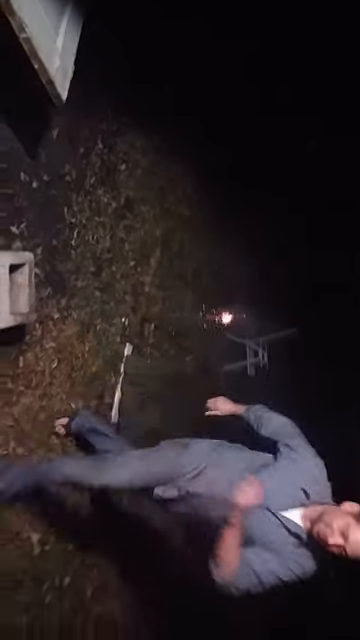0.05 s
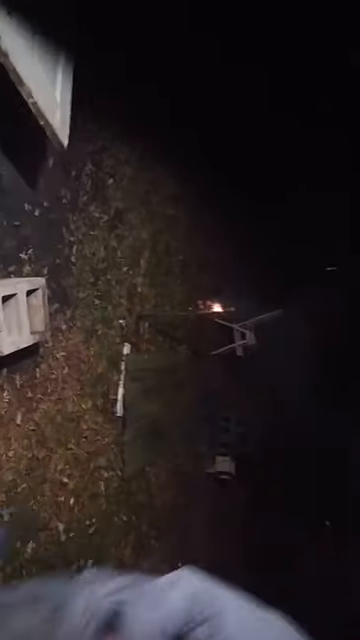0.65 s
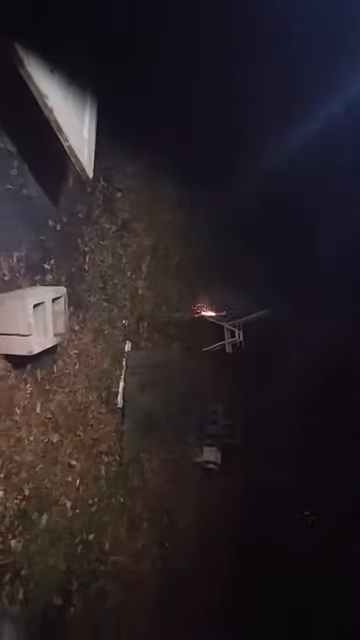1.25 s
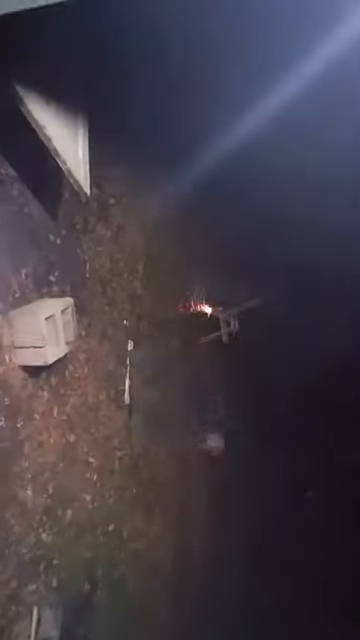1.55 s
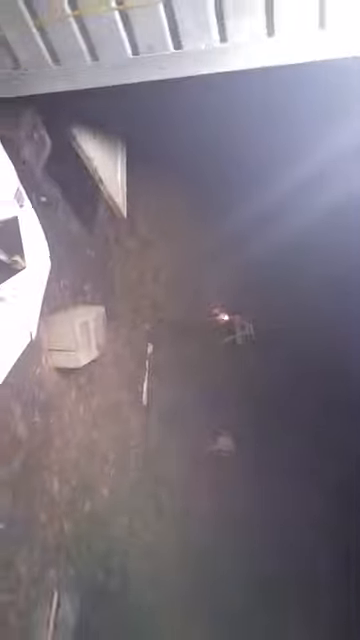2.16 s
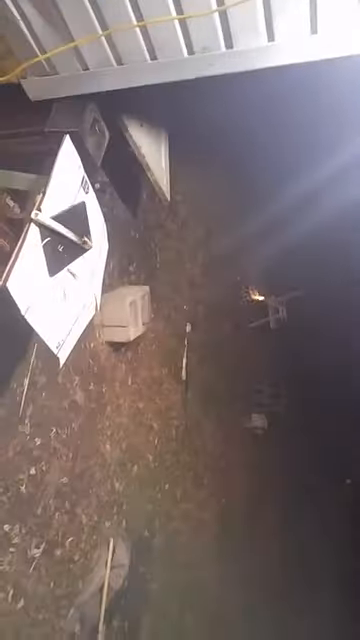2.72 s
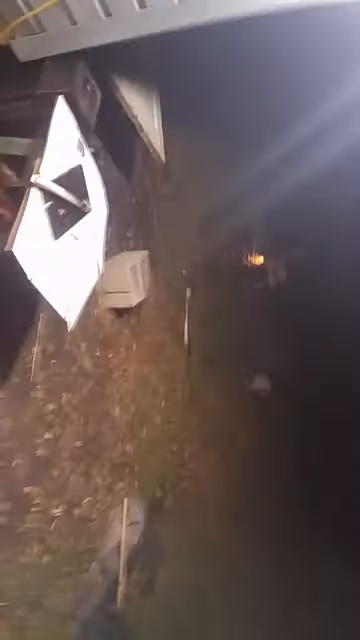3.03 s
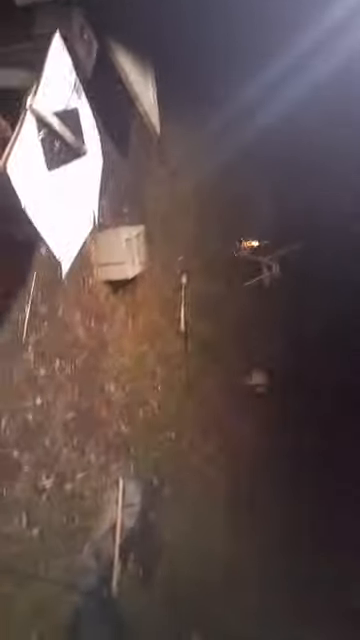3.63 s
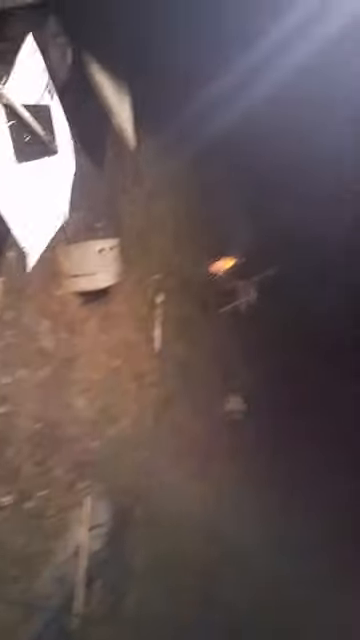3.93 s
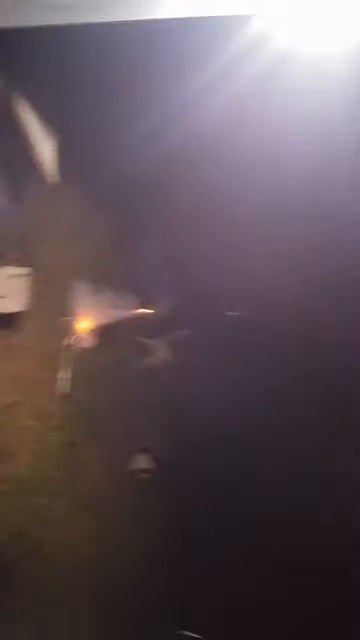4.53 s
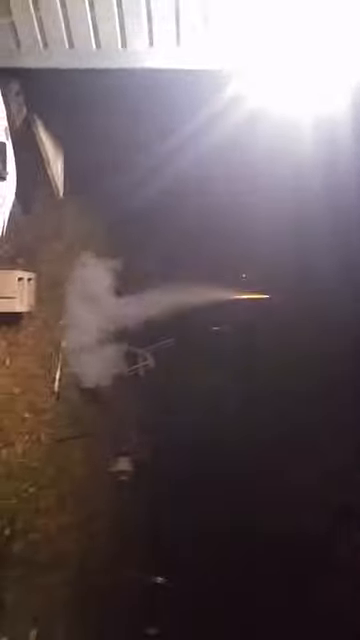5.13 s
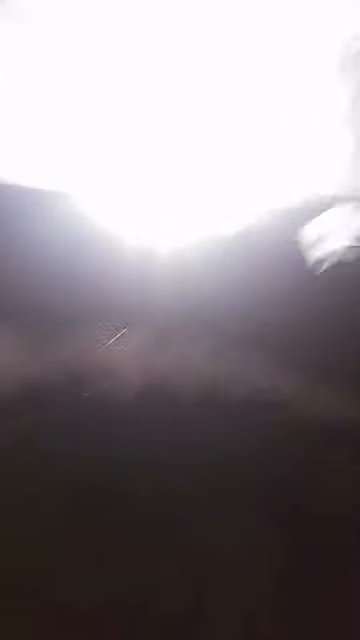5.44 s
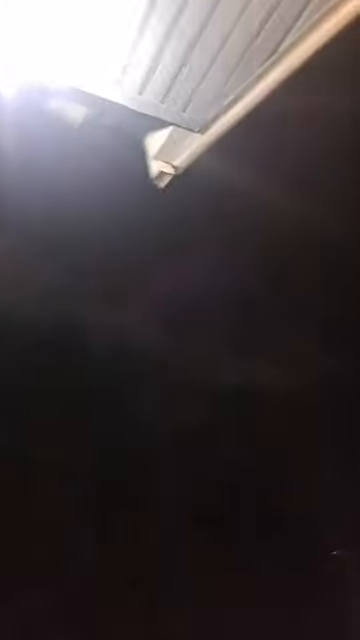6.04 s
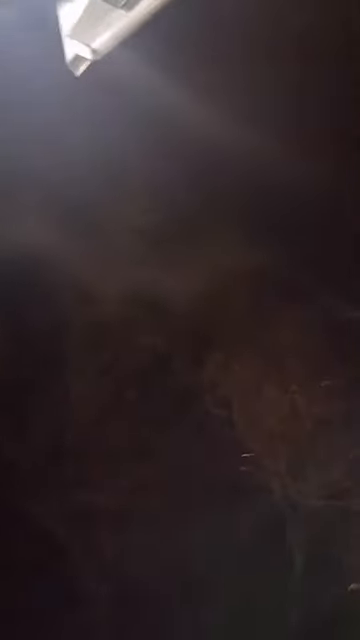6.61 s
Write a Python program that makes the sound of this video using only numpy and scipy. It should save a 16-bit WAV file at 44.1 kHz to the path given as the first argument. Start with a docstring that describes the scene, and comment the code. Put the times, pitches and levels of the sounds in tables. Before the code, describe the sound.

Footsteps crunch in dry leaves under thin high chirps, then a small rocket hisses, swells to a loud whoosh and quickly fades away.

```python
"""Feet rustle and crunch in dry leaves close by, in a yard at night, while a small animal gives thin,
high chirps and a fuse fizzes. A small rocket motor catches: gas whistles in the resonances of its
nozzle, then the turbulent jet swells to a tearing whoosh that overloads the microphone at lift-off.
As the rocket climbs, its ground echo lags ever more, and interference sweeps the fading sound."""
import sys
import numpy as np
from scipy import signal
from scipy.fft import rfft, irfft, next_fast_len
from scipy.io import wavfile
from scipy.ndimage import uniform_filter1d, map_coordinates

SR = 44100
rng = np.random.default_rng(int(sys.argv[2]) if len(sys.argv) > 2 else 0)


def transcribe(signal):
    """Save signal, clipped to [-1, 1], as a 16-bit WAV file at the path in sys.argv[1]."""
    frames = np.atleast_2d(signal).T
    limited = np.clip(frames, -1, 1)
    pcm = np.round(limited * 32767).astype(np.int16)
    wavfile.write(sys.argv[1], SR, pcm)


N = 302967
T = np.arange(N) / SR
SIZE = next_fast_len(N + 4096, True)
FREQS = np.fft.rfftfreq(SIZE, 1 / SR)

# Spectrum of crunching leaves and stems. Each row: frequency in Hz, level in dB.
CRUNCH_SPECTRUM = [(600, -16), (1000, 1.5), (1600, 3), (3000, -1), (5000, -3), (7000, -2.5), (10000, -7),
                   (15000, -27)]
# Low and middle modes of the ground and boards. Each row: frequency in Hz, bandwidth in Hz, level in dB.
THUD_RESONANCES = [(125, 77, -10), (262.6, 38, 1.5), (303.2, 64, 0), (379, 85, -8)]
KNOCK_RESONANCES = [(674.6, 60, -2.5), (767, 115, 5), (925, 157, -7.5)]


def undb(db):
    """Convert decibels to an amplitude ratio."""
    return 10 ** (np.asarray(db) / 20)


def unit(x):
    """Normalise to an rms of 1."""
    return x / np.sqrt(np.mean(x ** 2))


def curves(table):
    """Linear interpolation of each column over the times in the first."""
    times, *columns = np.transpose(table)
    return [np.interp(T, times, column) for column in columns]


def burst(start, rise, hold, decay):
    """Envelope with linear attack, hold and exponential decay, all in seconds."""
    return np.clip((T - start) / rise, 0, 1) * np.exp(-np.maximum(T - start - rise - hold, 0) / decay)


def noise():
    """Gaussian white noise."""
    return rng.standard_normal(N)


def waver(rate):
    """Random fluctuation of rms 1 that takes a new course `rate` times a second."""
    knots = rng.standard_normal(8000)
    return unit(np.interp(T * rate, np.arange(len(knots)), knots))


def grains(rate, spread_db):
    """Shot noise: `rate` random clicks a second, a few much larger than the rest."""
    size = undb(spread_db * np.minimum(rng.exponential(size=N), 4))
    return unit((rng.random(N) < rate / SR) * size * np.sign(noise()))


def colour(x, points):
    """Spectral shaping by (Hz, dB) points, falling 20 dB an octave beyond the ends."""
    hz, db = np.transpose(points)
    octave = np.log2(FREQS + 1)
    beyond = abs(octave - np.clip(octave, np.log2(hz[0]), np.log2(hz[-1])))
    gain = unit(undb(np.interp(octave, np.log2(hz), db) - 20 * beyond))
    return irfft(rfft(x, SIZE) * gain, SIZE)[:N]


def resonate(x, modes):
    """Forced vibration of parallel resonators, each given as (Hz, bandwidth in Hz, dB)."""
    out = 0
    for hz, width, db in modes:
        section = np.concatenate(signal.iirpeak(hz, hz / (1.5 * width), fs=SR))
        out = out + undb(db) * signal.sosfilt([section, section], x + 1e-18) / np.sqrt(width)
    return out * np.sqrt(.4 * SR / sum(undb(2 * db) for _, _, db in modes))


def delay(x, ms):
    """Propagation delay along a path whose length may change."""
    return map_coordinates(x, [(T - ms / 1000) * SR], order=3)


def yard(x, wet_db, t60, gap_s):
    """Reverberation: scattering from ground, house and trees adds a decaying tail of sparse echoes."""
    t = T[:SR // 2]
    tail = noise()[:len(t)] * (rng.random(len(t)) < .03) * undb(-60 * t / t60) * (t > gap_s)
    return x + undb(wet_db) * signal.oaconvolve(x, tail / np.linalg.norm(tail))[:N]


def night_air():
    """Ambient noise: a steady bed, a hollow resonant rustle, leaf ticks and a thin hiss near the end."""
    # Spectrum of the outdoor background. Each row: frequency in Hz, level in dB.
    air_spectrum = [(25, -40), (45, -5), (80, 1), (180, -0.5), (280, -6), (480, -6), (750, -3),
                    (1300, -9.5), (3500, -19.5), (7000, -18.5), (9000, -16.5), (11000, -25.5), (15500, -26)]
    rustle = undb(-.5) * resonate(noise(), THUD_RESONANCES)
    rustle += undb(-.3) * resonate(noise(), KNOCK_RESONANCES)
    ticks = colour(grains(rate=45, spread_db=3.8), CRUNCH_SPECTRUM)
    ticks = yard(ticks, wet_db=1.5, t60=.069, gap_s=.0005)
    hiss = colour(noise(), [(6000, -8), (11000, -2), (15500, -4)]) * np.clip((T - 6.52) / .1, 0, 1)
    bed = undb(-49) * colour(noise(), air_spectrum)
    return bed + undb(-50.7 + 2.5 * waver(13)) * rustle + undb(-61.5) * ticks + undb(-57.5) * hiss


def animal_chirps():
    """Frequency modulation: each slightly raspy squeak glides down through its pitch."""
    # The animal's calls. Each row: time in seconds, relative level in dB, pitch in Hz, length in seconds.
    calls = [(0.005, -35, 8100, .029), (0.054, -31.5, 9030, .011), (0.102, -29, 8930, 0.032),
             (0.51, -30, 8630, 0.0093), (0.751, -25.5, 8640, .018), (0.83, -36, 8960, 0.0083),
             (0.993, -27, 8420, 0.011), (1.204, -31.5, 8470, .017), (1.507, -19, 8200, .012),
             (1.522, -24, 9260, 0.019), (1.72, -30, 9600, 0.017), (1.777, -23, 8840, 0.0064),
             (1.84, -26.5, 8800, 0.0096), (1.907, -22, 8610, .013), (2.025, -19, 8820, 0.0068),
             (2.0897, -21, 8460, 0.0088), (2.218, -21.5, 8420, 0.0078), (2.412, -15.5, 8340, 0.0088),
             (2.547, -26, 8400, .007), (2.727, -26.5, 8370, .011), (2.794, -21, 8260, .01),
             (3.068, -17, 8800, 0.0068), (3.585, -18, 8940, 0.0069), (3.697, -23, 9060, .008),
             (3.759, -25, 9200, 0.011), (3.824, -17.5, 8320, 0.0097), (3.887, -19, 9290, 0.0097),
             (5.947, -31, 8340, .009), (6.186, -31.5, 8620, 0.021), (6.273, -33, 8860, 0.0076),
             (6.4, -23.5, 8346, 0.012), (6.782, -20, 8060, 0.015), (6.84, -15, 8900, .007)]
    out, t = np.zeros(N), T[:SR // 10]
    rasp = 1 + .023 * waver(900)
    for start, db, hz, length in calls:
        i = max(int((start - .0025) * SR), 0)
        swoop = .0577 * np.exp(.1 * (db + 21.5))  # louder calls glide further
        pitch = hz * (1 + swoop * (1.71 * np.exp(-t / .00367) - .4))
        tone = np.sin(2 * np.pi * np.cumsum(pitch[:N - i] * rasp[i:i + len(t)]) / SR)
        swell = (1 - np.exp(-(t / .0027) ** 2)) * np.exp(-(t / length) ** 2)
        out[i:i + len(t)] += undb(db - 4.5) * swell[:N - i] * tone
    fluttering = yard(out, wet_db=-.5, t60=.12, gap_s=.002)
    return yard(fluttering, wet_db=-10.5, t60=.35, gap_s=.01)


def footsteps():
    """Impact excitation: brush, heel and toe each drive the ground's modes and crush dry leaves."""
    # Steps and scuffs. Each row: heel time in seconds, level in dB, hardness in dB, length in seconds.
    footfalls = [(0.065, -33, -8, .065), (0.385, -25, -3, 0.053), (0.598, -40.5, 4.5, .03),
                 (0.692, -33.5, 0.5, .042), (0.77, -37, -2.5, 0.043), (0.842, -36.5, -5, 0.036),
                 (0.976, -28.5, -9.5, 0.07), (1.042, -28, -0.5, 0.051), (1.409, -29.5, -1, 0.042),
                 (1.599, -32.5, -1.5, 0.057), (1.634, -29, -1, 0.073), (1.952, -33.5, -2.5, 0.049),
                 (2.11, -38, 7, 0.022), (2.148, -30.5, -5.5, 0.073), (2.226, -34.5, -1.5, 0.1),
                 (2.28, -25.5, -2, 0.047), (2.468, -31.5, -4, 0.073), (2.571, -35.5, 4, .029),
                 (2.618, -32.5, -2.5, .1), (2.738, -38, 2, 0.084), (2.899, -29, -1, 0.067),
                 (2.984, -38, 4, 0.048), (3.192, -30.5, 0.5, 0.14), (3.458, -24.5, -1, 0.048),
                 (3.537, -30, -3, 0.062), (3.683, -31, -1.5, .05), (3.754, -33.5, -2, 0.031),
                 (3.992, -30, 0.5, 0.033), (4.057, -31.5, -1, 0.052), (4.111, -28.5, -5, 0.055),
                 (4.427, -28, -4, 0.07), (5.939, -30.5, 4.5, 0.052), (6.177, -36, 3.5, 0.079),
                 (6.577, -27.5, 5.5, 0.053), (6.639, -29.5, 4.5, .05), (6.825, -28, -4, 0.092)]
    # Resonances of single leaves. Each row: frequency in Hz, bandwidth in Hz, level in dB.
    leaf_modes = [(1370, 240, -0.5), (1740, 420, -2.5), (2330, 500, 0.5), (2890, 560, -3.5),
                  (4170, 470, -13)]
    power, t = np.zeros((3, N)), T[:SR // 3]
    for start, db, ground_db, length in footfalls:
        brush = (-.0487, -16, ground_db + 3.5, .11)
        heel = (0, 0, ground_db, length)
        toe = (.0723, -8, ground_db - 3, length)
        for lag_s, part_db, hard_db, span_s in [brush, heel, toe]:
            push = (1 - np.exp(-t / .002)) * np.exp(-(t / span_s) ** 1.5)
            knock = undb(hard_db - .3) * push
            crunch = undb(.72 * hard_db - 7.3) * push ** 1.57
            envelopes = undb(db + part_db) * np.array([push, knock, crunch])
            i = max(int((start + lag_s) * SR), 0)
            power[:, i:i + len(t)] += envelopes[:, :max(N - i, 0)] ** 2
    thud, knock, crunch = np.sqrt(power + 1e-18)  # incoherent sounds add in power
    body = resonate(noise() * thud, THUD_RESONANCES) + resonate(noise() * knock, KNOCK_RESONANCES)
    # Stems tick across the whole band; each leaf cracks at its own pitch and moment.
    stems = colour((grains(900, 2.7) + .54 * noise()) * crunch, CRUNCH_SPECTRUM)
    leaves = sum(undb(db) * resonate(grains(300, 2.8) * crunch, [(hz, width, 0)])
                 for hz, width, db in leaf_modes)
    return undb(-5) * body + yard(undb(-5) * stems + undb(-9.5) * leaves, wet_db=-10, t60=.5, gap_s=.008)


def stick_clacks():
    """Damped vibration: a short scrape rings two inharmonic modes of a stick."""
    # Sticks underfoot. Each row: start in seconds, relative level in dB, pitch in Hz.
    sticks = [(0.0745, -27.5, 2000), (0.784, -31, 1460), (0.9009, -30, 1400), (1.0143, -21, 1760),
              (1.4047, -29, 1400), (2.154, -23.5, 1430), (2.2494, -31, 1390), (2.485, -28, 2170),
              (2.9943, -26.5, 1470), (3.2004, -24.5, 2760), (3.4626, -24, 1400), (3.5089, -21.5, 2220),
              (3.909, -32, 2150), (3.9931, -25, 1370), (4.0366, -22, 1390), (4.141, -21.5, 2330)]
    out, t = np.zeros(N), T[:SR // 12]
    for start, db, hz in sticks:
        scrape = noise()[:len(t)] * np.exp(-t / .0065)
        phase = 2 * np.pi * hz * t
        ring = np.exp(-t / .00099) * (np.sin(phase) + .24 * np.sin(1.56 * phase))
        clack = np.convolve(scrape, ring[:600])[:len(t)]
        i = int(start * SR)
        out[i:i + len(t)] += undb(db - 5) * clack / abs(clack).max()
    return yard(out, wet_db=-5.5, t60=.25, gap_s=.0033)


def snaps():
    """Impulsive sources: twigs and sparks crack so briefly that their spectrum is broad."""
    # Snapping twigs and sparks. Each row: start in seconds, relative level in dB.
    snap_events = [(1.637, -20), (2.0078, -30), (2.4858, -27.5), (2.616, -27.5), (2.898, -19.5),
                   (3.261, -23), (3.509, -29), (3.994, -22), (6.551, -28), (6.5796, -33)]
    cracks = np.zeros(N)
    for start, db in snap_events:
        crack = noise()[:200] * np.exp(-T[:200] / .0005)
        i = int(start * SR)
        cracks[i:i + len(crack)] += undb(db) * crack / abs(crack).max()
    cracks = colour(cracks, [(500, 1), (2000, 1), (6200, -1), (10000, -6), (15000, -24)])
    return yard(undb(6.5) * cracks, wet_db=-10, t60=.29, gap_s=.004)


def fuse():
    """Combustion noise: powder sputters steadily and spurts now and then, until the motor takes over."""
    # Spurts of burning powder. Each row: start in seconds, level in dB, hold in seconds.
    spurts = [(0.2, -57, .03), (0.612, -59, 0.069), (1.038, -53, 0.042), (1.47, -57, .02),
              (2.598, -48, .02), (3.208, -49.5, 0.022)]
    # Spectrum of the fizz. Each row: frequency in Hz, level in dB.
    fizz_spectrum = [(2000, -21), (4500, -10.5), (7000, -4.5), (9000, -3.5), (11000, -10), (15000, -19)]
    power = undb(-63 + 2.9 * waver(8)) ** 2
    for start, db, hold in spurts:
        power += (undb(db) * burst(start, rise=.023, hold=hold, decay=.045)) ** 2
    fizz = colour(grains(2100, 10) + 2.08 * noise(), fizz_spectrum)
    return fizz * np.sqrt(power) * np.interp(T, [3.95, 4.35], [1, 0])


def nozzle_whistle():
    """Flow-excited resonance: the first gas whistles thinly, and more modes join as pressure builds."""
    # Strength of the whistle. Each row: time in seconds, relative level in dB.
    gas_flow = [(3.45, -70), (3.58, -50), (3.85, -45), (3.95, -47), (4.15, -42.5), (4.42, -42), (4.6, -50),
                (4.8, -65)]
    # Nozzle resonances. Each row: frequency in Hz, bandwidth in Hz, level in dB, onset in seconds.
    nozzle_modes = [(2330, 200, -5.5, 4.1), (2900, 160, -2, 4.05), (5400, 550, -4, 3.1),
                    (6360, 450, 0.5, 3.88), (7340, 670, 0, 3.92), (9020, 170, 7, 4.2)]
    level_db, = curves(gas_flow)
    gas = np.zeros(N)
    for hz, width, db, start in nozzle_modes:
        onset = np.clip((T - start) / .098, 0, 1)
        gas += resonate(noise(), [(hz, width, 0)]) * undb(db + waver(20)) * onset
    return gas * undb(level_db - 7.5) * (T < gas_flow[-1][0])


def lift_off_roar():
    """Amplitude-modulated low noise buffets briefly at lift-off; its deepest part decays more slowly."""
    # Spectrum of the roar. Each row: frequency in Hz, level in dB.
    roar_spectrum = [(20, -28), (36, -12), (52, 1), (100, -1.5), (188, -1.5), (233, -4.5), (422, 3.5),
                     (474, -1.5), (965, -9.5), (1300, -17.5), (1690, -60)]
    gust = colour(noise(), roar_spectrum) * undb(-4.3 + 1.8 * waver(60))
    rumble = undb(-12) * signal.sosfilt(signal.butter(2, 110, fs=SR, output="sos"), gust)
    timing = dict(start=5.268, rise=.035, hold=.092)
    return gust * burst(**timing, decay=.017) + rumble * burst(**timing, decay=.035)


def jet_reflections(jet, airborne):
    """Comb filtering: echoes interfere with the direct jet; the ground's notches fall as it climbs."""
    # Echo lags behind the direct sound. Each row: time in seconds, ground lag in ms, wall lag in ms.
    echo_lags = [(4.55, 1.24, 13.1), (4.8, 1.3, 12.2), (5.03, 1.59, 11.4), (5.26, 2.52, 11.0),
                 (5.53, 7.6, 8.5), (5.72, 9, 11), (6.05, 9.9, 11)]
    ground_ms, wall_ms = curves(echo_lags)
    soft = signal.sosfilt(signal.butter(1, 2600, fs=SR, output="sos"), jet)  # grass absorbs the treble
    ground = undb(-7.5) * delay(soft, ground_ms)
    wall = undb(-12) * (1 - airborne) * delay(jet, wall_ms)
    eaves = undb(-10.5) * airborne * delay(soft, ms=2.05)
    return yard(jet + ground + wall + eaves, wet_db=-16.5, t60=.22, gap_s=.015)


def rocket_jet():
    """Turbulent mixing noise with a fine crackle: it brightens with thrust and dulls with distance."""
    # Thrust building on the pad. Each row: time in seconds, relative jet level in dB.
    thrust = [(3.85, -61), (4.15, -46.5), (4.39, -42), (4.5, -32.5), (4.62, -30), (4.77, -26.5),
              (5.23, -23)]
    # The surge at lift-off. Each row: time in seconds, level added to the thrust in dB.
    surge = [(5.235, 1.5), (5.28, 20), (5.335, 15.5), (5.38, 15.5)]
    # Spectrum of the turbulence. Each row: frequency in Hz, level in dB.
    jet_spectrum = [(100, -10), (200, -10.5), (290, -6.5), (450, -11.5), (680, -4), (900, -8), (1400, -9.5),
                    (2700, -4.5), (4500, -3), (6600, -1.5), (8400, -3), (10100, -8), (12500, -14),
                    (15500, -18.5)]
    thrust_db, = curves(thrust)
    surge_db, = curves(surge)
    away_s = np.maximum(T - 5.38, 0)  # time spent climbing away
    airborne = np.interp(T, [5.15, 5.35], [0, 1])
    turbulence = colour((noise() + .4 * grains(4000, 2.7)) * undb(.5 * waver(70)), jet_spectrum)
    low = colour(turbulence, [(60, -13), (150, -5), (400, 2.5), (1000, 1.5), (1600, -7.5), (3000, -18)])
    middle = colour(turbulence,
                    [(900, -4.5), (1600, 2.5), (6500, -1), (9000, -4.5), (11000, -9), (15000, -30)])
    high = colour(turbulence, [(5000, -13), (8000, -6.5), (10500, -3), (15000, -1.5)])
    # A hollow note sounds while the jet still strikes the pad.
    pad = undb(-6.5) * (1 - airborne) * resonate(noise(), [(706, 150, 0)])
    # The nozzle beams its treble; distance takes it away again, and the low rush lingers.
    effort_db = thrust_db + 29.5
    bright_db = .7 + .42 * effort_db + .33 * surge_db - 45 * away_s
    rush_db = -2.5 - .35 * effort_db - .42 * surge_db + 25.5 * away_s
    jet = undb(.5) * unit(middle) + undb(bright_db) * unit(high) + undb(rush_db) * (unit(low) + pad)
    jet *= undb(thrust_db + surge_db - 62.5 * away_s - 4) * np.interp(T, [3.75, 4], [0, 1])
    return jet_reflections(jet, airborne)


def scene():
    """Superposition: all sources add at one microphone, which feeds both channels."""
    launch = fuse() + nozzle_whistle() + rocket_jet() + lift_off_roar()
    mono = launch + footsteps() + stick_clacks() + snaps() + animal_chirps() + night_air()
    return np.array([mono, mono])


def record(dry):
    """Overload: the microphone port colours the sound, gain ducks, peaks saturate and the top is cut."""
    # Peaks and dips of the microphone port. Each row: frequency in Hz, width in Hz, gain in dB.
    port_bands = [(505, 122, -6), (734, 165, 2), (6590, 780, 2), (7800, 470, -6.5), (8280, 2340, 6)]
    threshold_db, excess_share, recovery_db_per_s = -14, .44, 7
    port_db = sum(db * np.exp(-(2 * (FREQS - hz) / width) ** 2) for hz, width, db in port_bands)
    sound = irfft(rfft(dry, SIZE) * undb(port_db), SIZE)[:, :N]
    level_db = 10 * np.log10(np.maximum(uniform_filter1d(sound[0] ** 2, size=800), 1e-12))
    cut_db = excess_share * np.maximum(level_db - threshold_db, 0)
    recovery_db = recovery_db_per_s * T
    held_cut_db = np.maximum.accumulate(cut_db + recovery_db) - recovery_db  # ducks fast, lets go slowly
    sound = sound * undb(-held_cut_db)
    saturated = sound / (1 + sound ** 4) ** .25
    return signal.sosfilt(signal.ellip(10, .2, 70, 15700, fs=SR, output="sos"), saturated)


dry = scene()
out = record(dry)
transcribe(out)
```